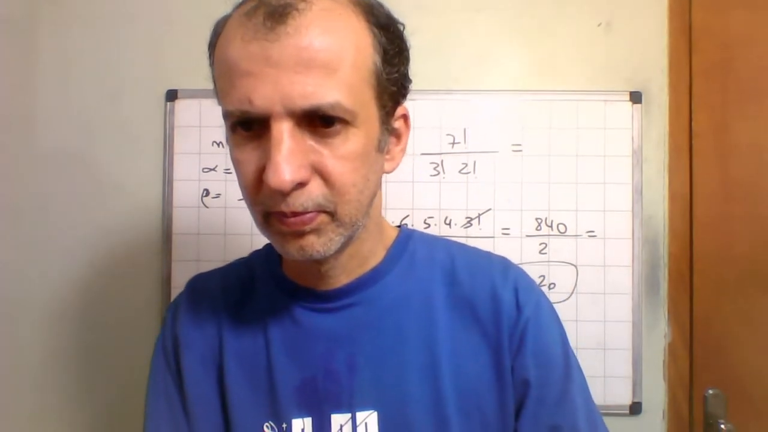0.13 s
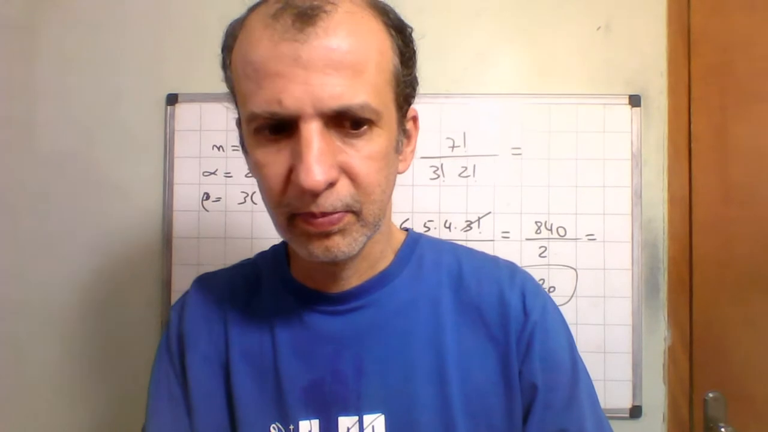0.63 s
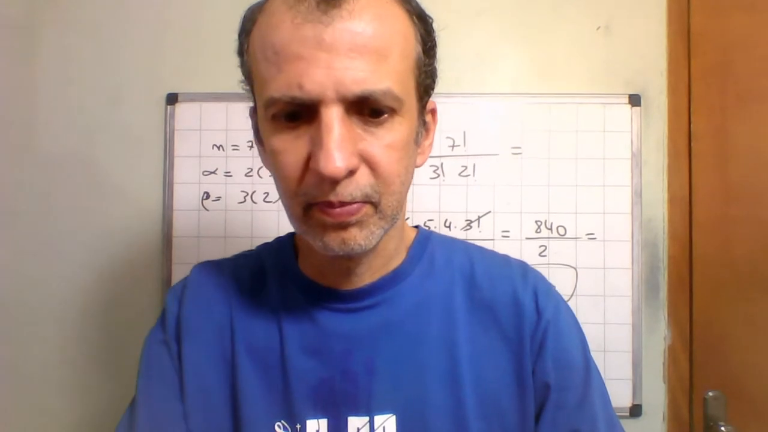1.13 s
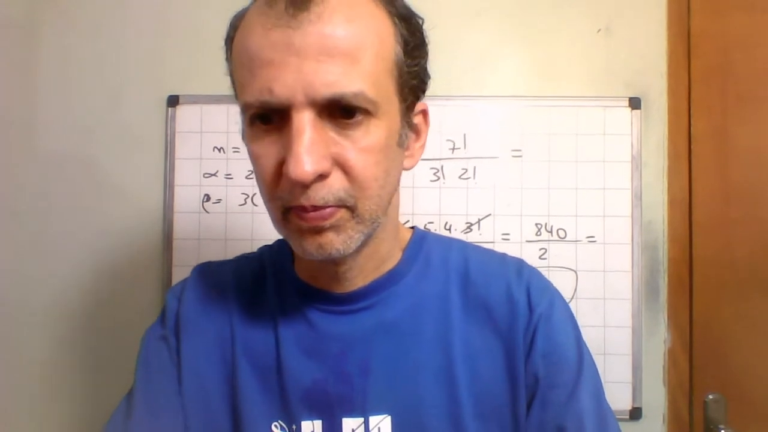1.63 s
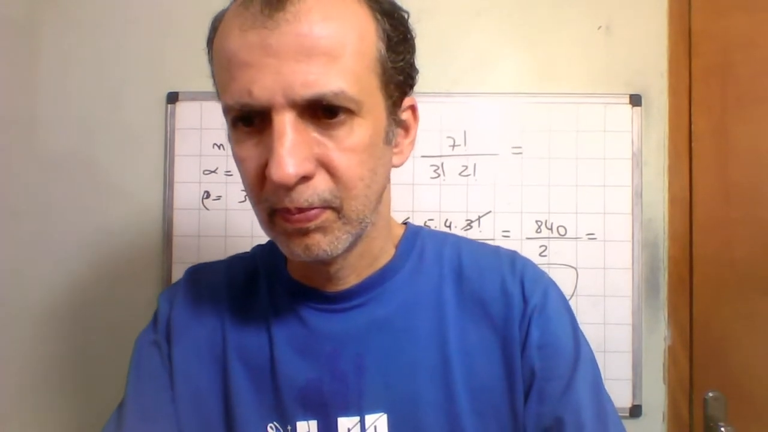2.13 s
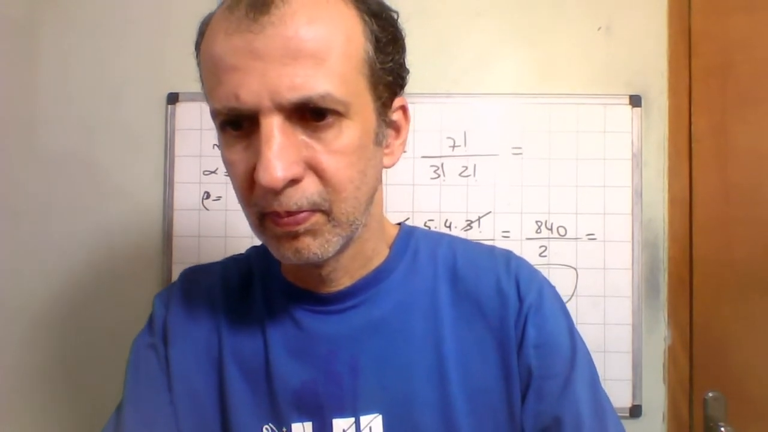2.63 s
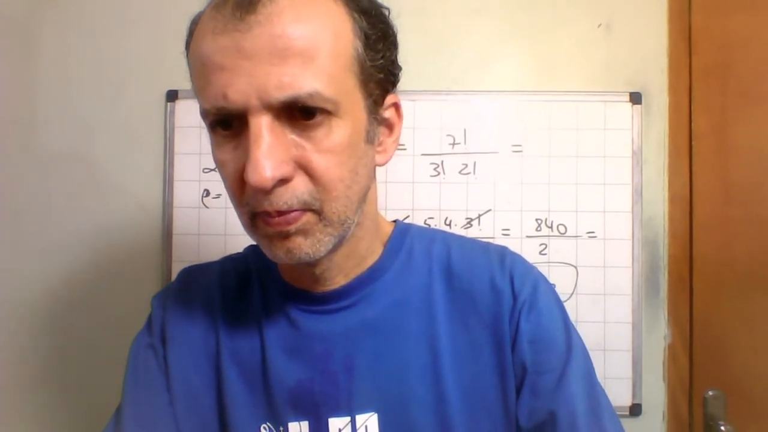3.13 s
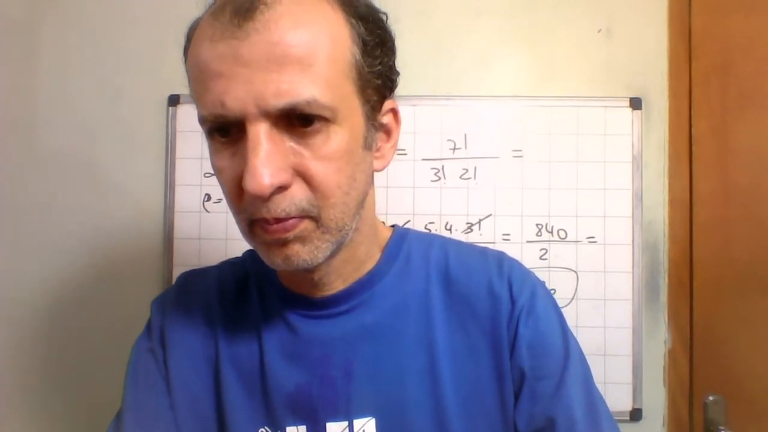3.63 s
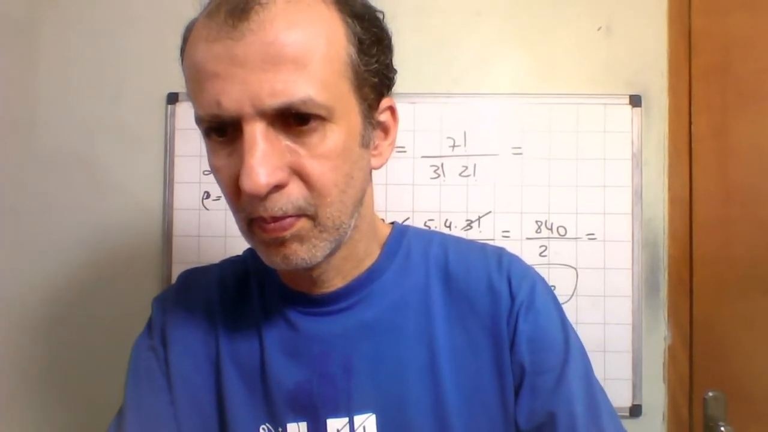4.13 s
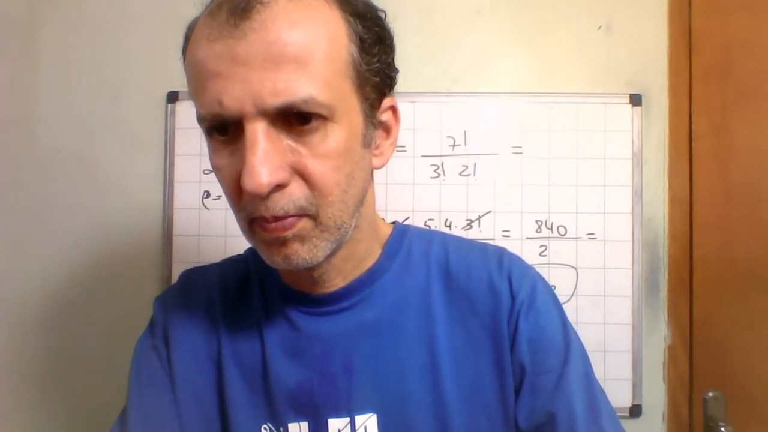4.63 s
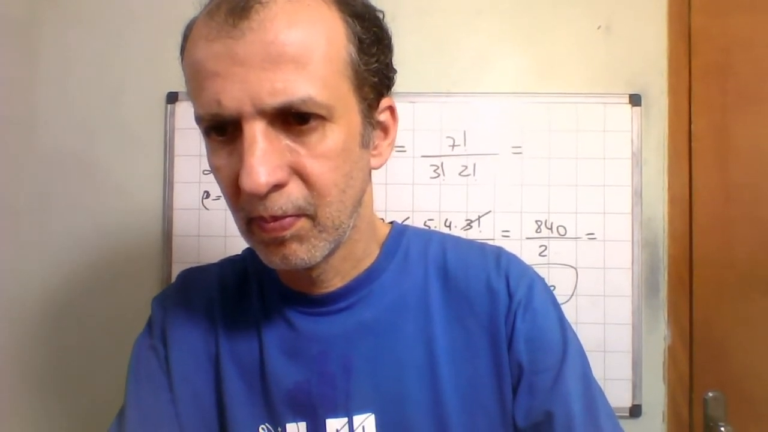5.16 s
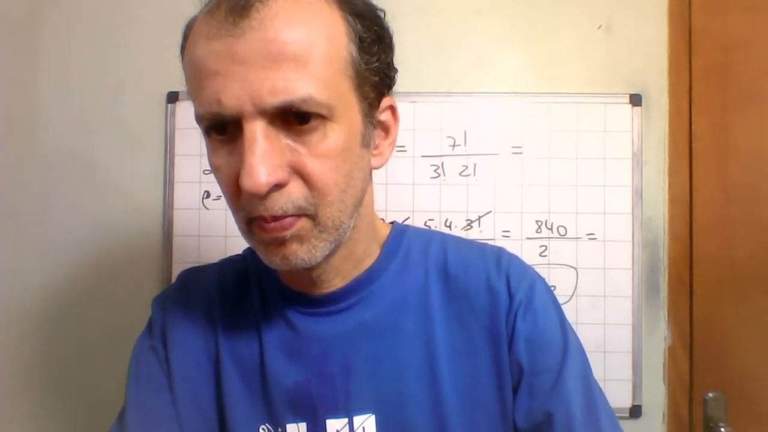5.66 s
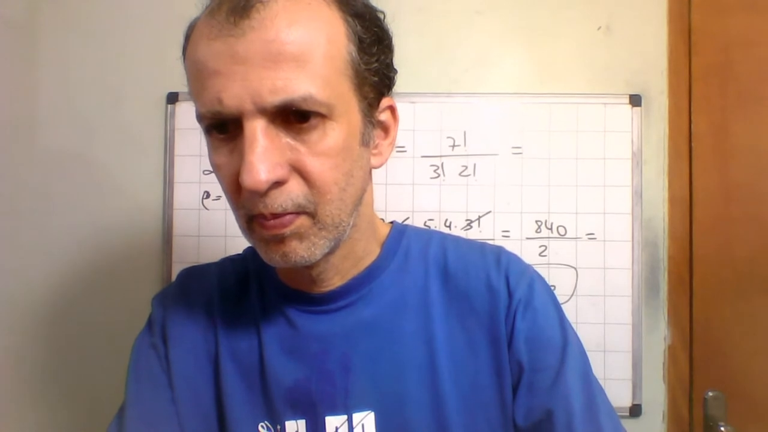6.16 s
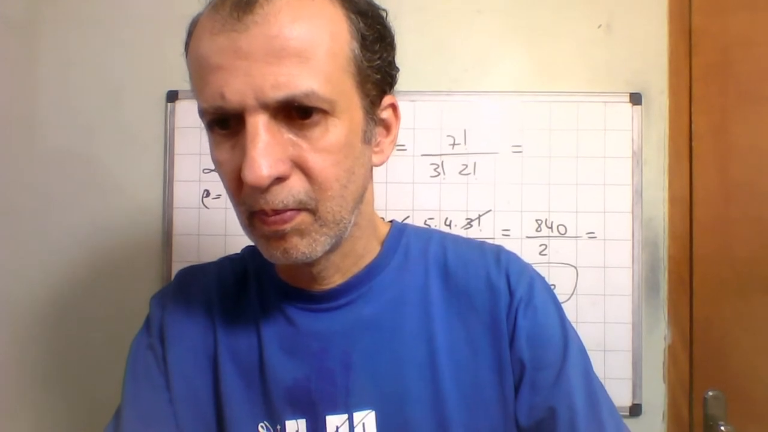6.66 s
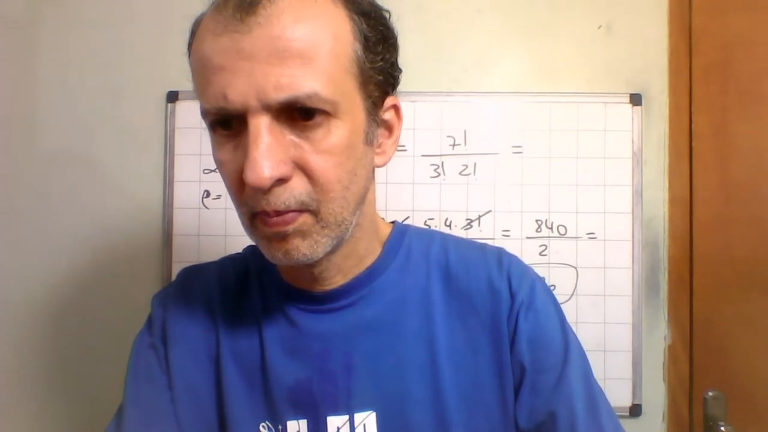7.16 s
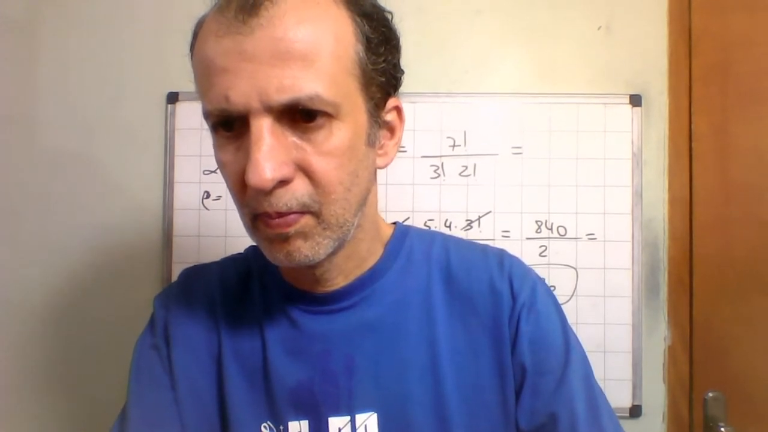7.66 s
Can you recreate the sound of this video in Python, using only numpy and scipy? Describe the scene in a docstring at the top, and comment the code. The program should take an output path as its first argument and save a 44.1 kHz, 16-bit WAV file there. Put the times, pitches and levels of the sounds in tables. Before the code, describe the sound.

A few sparse key taps, then busy laptop typing, clacky and thumpy up close, with a faint fan and short pauses.

```python
"""A quiet room, close to a laptop: its built-in microphone hears someone type on it for almost eight seconds.
A fan hisses from the start over two low motor tones; a few sparse keys come first, then busy typing.
Each contact ticks and clacks in the air as bursts of noise through resonances, then knocks the deck's modes;
low thumps swell through the case, their lowest modes last, and the room answers clicks and knocks with a blurred echo.
A noise gate turns everything down in the pauses, as before the last keys."""
import sys
import numpy as np
from scipy import signal
from scipy.fft import rfft, irfft, next_fast_len
from scipy.io import wavfile
from scipy.ndimage import uniform_filter1d, minimum_filter1d, map_coordinates

SR = 44100
rng = np.random.default_rng(int(sys.argv[2]) if len(sys.argv) > 2 else 0)


def field_ratio(decibels):
    """Amplitude ratio for a level in dB (20 dB per decade); scalars and array-likes work."""
    return 10 ** (np.asarray(decibels, dtype=float) / 20)


def materialize(psi):
    """Save the field psi as 16-bit PCM at rate SR to the path in sys.argv[1].

    A 1-D psi becomes a single channel; in a 2-D psi each row is a channel.
    """
    bounded = np.clip(np.atleast_2d(psi).T, -1, 1)
    quanta = np.round(bounded * 32767).astype(np.int16)
    wavfile.write(sys.argv[1], SR, quanta)


N = 343098  # samples


def along(points, hz):
    """Interpolates (f/Hz, value) points on a log frequency axis."""
    f, v = np.transpose(points)
    return np.interp(np.log(hz + 1), np.log(f + 1), v)


def coloured(x, spectrum):
    """Filters x by a response given as (f/Hz, level/dB) points."""
    size = next_fast_len(len(x) + 8192)
    gain = field_ratio(along(spectrum, np.fft.rfftfreq(size, 1 / SR)))
    return irfft(rfft(x, size) * gain, size)[:len(x)]


def noise(spectrum):
    """Coloured noise of rms 1."""
    x = coloured(rng.standard_normal(N), spectrum)
    return x / x.std()


def add(track, sound, s):
    """Lays a sound on a track from second s, trimmed to the track's ends."""
    start = round(s * SR)
    part = track[max(start, 0):][:len(sound) + min(start, 0)]
    part += sound[max(-start, 0):][:len(part)]


def ring(modes, spread_db, attack, size):
    """One blow on decaying modes, each at a new strength and phase; power 1 before attack (s) and decay."""
    hz, db, t60 = np.transpose(modes)[:, :, None]
    t = np.arange(size) / SR
    gain = field_ratio(db + spread_db * rng.standard_normal(hz.shape))
    waves = field_ratio(-60 * t / t60) * np.sin(2 * np.pi * (hz * t + rng.random(hz.shape)))
    onset = 1 - np.exp(-t / attack)
    return (gain * waves).sum(0) * onset / np.sqrt((gain ** 2).sum() / 2)


def resonate(x, peaks, order=1):
    """Passes x order times through causal resonances, scaled to keep the power of white noise."""
    size = next_fast_len(len(x) + 8192)
    f = np.fft.rfftfreq(size, 1 / SR)
    response = 0
    for k, (centre, width, db) in enumerate(peaks):
        peak = 1j * f * width / (centre * centre - f * f + 1j * f * width)
        response = response + (-1) ** k * field_ratio(db) * peak  # neighbours in opposite phase
    response = response ** order
    return irfft(rfft(x, size) * response, size)[:len(x)] / np.sqrt(np.mean(abs(response) ** 2))


CLUMP_S, CLUMP_DB = .002, 3  # the tiny collisions come in clumps: spacing, depth


def clatter(times, levels, lead, hold, t60, grit_db):
    """Each contact is a cluster of tiny collisions of set energy: they build up over lead s, hold, then thin out."""
    out = np.zeros(N)
    t = np.arange(-SR // 50, SR // 20) / SR
    shape = np.where(t < 0, field_ratio(60 * t / lead), field_ratio(-60 * np.maximum(t - hold, 0) / t60))
    steps = np.arange(len(times) * len(t))
    # grit: the size wanders between random values 20 samples apart
    grit = rng.standard_normal(len(steps) // 20 + 2)
    sizes = field_ratio(grit_db * map_coordinates(grit, [steps / 20], order=1))
    clump = rng.standard_normal(len(steps) // 20)
    clumps = field_ratio(CLUMP_DB * map_coordinates(clump, [steps / SR / CLUMP_S], order=1))
    collisions = sizes * clumps * rng.standard_normal(len(steps))
    bursts = shape * collisions.reshape(len(times), -1)
    for s, gain, burst in zip(times, levels, bursts):
        add(out, gain * burst * np.linalg.norm(shape) / np.linalg.norm(burst), s + t[0])
    return out


# colour of the fan's air noise: f/Hz, relative level/dB per Hz
FAN_AIR = [(45, -27.5), (80, -12.5), (140, -5.5), (290, -12), (420, -15), (800, -17.5), (1100, -26.5),
           (1500, -23.5), (1680, -23.5), (1850, -26.5), (2300, -35.5), (4600, -41), (5800, -32),
           (8650, -31.5), (11500, -38.5)]
# motor tones, ahead of the microphone: f/Hz, level/dB rms
MOTOR_TONES = [(64.6, -76), (91.5, -67)]


def fan():
    """Steady air noise whose level drifts a little, over two low motor tones."""
    t = np.arange(N) / SR
    drift = rng.standard_normal(N * 8 // SR + 4)  # eight points a second
    drift_db = .7 * map_coordinates(drift, [t * 8])
    hum = sum(field_ratio(db) * np.sqrt(2) * np.sin(2 * np.pi * (hz * t + rng.random())) for hz, db in MOTOR_TONES)
    return field_ratio(-61 + drift_db) * noise(FAN_AIR) + hum


# the room's decay: f/Hz, t60/s
ROOM_DECAY = [(300, 0.21), (1500, 0.26), (4000, 0.3), (10000, 0.33)]


def room(x):
    """Reflections blur into noise with the broad colour of the source; each frequency dies at its own speed."""
    hz, t, z = signal.stft(x, SR, nperseg=256)
    power = uniform_filter1d(abs(z) ** 2, size=7, axis=0)
    fade = field_ratio(-60 * t[:200] / along(ROOM_DECAY, hz)[:, None]) ** 2
    heard = signal.fftconvolve(power, fade / fade.sum(1)[:, None], axes=1)[:, :len(t)]
    blur = signal.stft(rng.standard_normal(N), SR, nperseg=256)[2]
    tail = signal.istft(np.sqrt(abs(heard)) * blur / blur.std(), SR, nperseg=256)[1]
    return np.pad(tail, (220, 0))[:N]  # the echo sets in 5 ms late


# blows felt through the case: peak t/s, level/dB ahead of the microphone, centre of the modes it stirs f/Hz
CASE_BLOWS = [(0.082, -54, 147), (0.142, -55.5, 85), (0.645, -49.5, 141), (0.692, -47.5, 150),
              (0.825, -48, 160), (0.956, -37.5, 181), (1.123, -27.5, 167), (1.319, -23, 168),
              (1.339, -26.5, 152.4), (1.441, -25.5, 155), (1.632, -24.5, 111), (1.771, -26, 123),
              (1.802, -26.5, 117.3), (1.955, -18.5, 188), (2.146, -24, 147), (2.243, -45.5, 151.6),
              (2.293, -25, 136.6), (2.33, -25, 163), (2.496, -23, 163), (2.62, -27, 158),
              (2.671, -22.5, 125), (2.775, -31.5, 121), (3.066, -21.5, 171), (3.201, -23, 203),
              (3.25, -25, 194), (3.273, -30.5, 126), (3.38, -27, 170), (3.588, -47.5, 185),
              (3.69, -20.5, 163), (3.851, -22.5, 140), (3.983, -22, 187), (4.057, -27.5, 200),
              (4.123, -29.5, 138), (4.205, -34, 224), (4.228, -33.5, 125), (4.268, -20.5, 165),
              (4.444, -26, 182), (4.471, -26, 136), (4.496, -24.0, 156), (4.65, -26.5, 150),
              (4.938, -22, 160), (5.073, -30.5, 154.4), (5.191, -29, 144), (5.327, -26, 174),
              (5.384, -46, 143), (5.535, -23, 164.3), (5.666, -29, 165), (5.736, -24.5, 205),
              (5.76, -26, 132), (5.84, -33, 202), (5.883, -28, 222), (5.924, -23.5, 161),
              (6.029, -23.5, 141.0), (6.062, -26.5, 157), (6.163, -24.5, 157), (6.193, -27, 170),
              (6.317, -28.5, 141), (6.408, -34.5, 132.0), (6.493, -27.5, 148), (6.564, -21, 161),
              (6.684, -38, 134), (6.746, -28.5, 168), (6.768, -28.5, 143), (6.865, -31.5, 140),
              (6.917, -30.5, 156), (7.442, -35, 137), (7.466, -33.5, 113), (7.573, -26.5, 148)]
# modes of the case: f/Hz, relative level/dB, t60/s
CASE_MODES = [(75.8, 1.5, 0.27), (106.3, 3, 0.19), (132, 4, 0.16), (152.7, 7, 0.12), (181.5, -5.5, 0.26),
              (214.2, 6.5, 0.093), (259, 1.5, 0.075)]


def thumps():
    """Bending waves swell slowly, the low ones arriving last; the modes nearest the blow's centre lead."""
    out = np.zeros(N)
    hz, db, t60 = np.transpose(CASE_MODES)[:, :, None]
    t, lead = np.arange(SR // 4) / SR, .03  # s; lead leaves room for the swell before the peak
    for s, level_db, centre_hz in CASE_BLOWS:
        off_centre_db = -13.2 * np.log2(hz / centre_hz) ** 2
        gain = field_ratio(db + off_centre_db + 3.8 * rng.standard_normal(hz.shape))
        phase = 2 * np.pi * rng.random() + 1.76 * rng.standard_normal(hz.shape)
        since = t - lead - 0.0054 * np.log2(centre_hz / hz)  # 5.4 ms later per octave down
        rise = 3.3 / hz  # 3.3 cycles
        swell = np.sin(np.pi / 2 * np.clip(1 + since / rise, 0, 1)) ** 2
        decay = field_ratio(-60 * np.maximum(since, 0) / t60)
        waves = gain * swell * decay * np.cos(2 * np.pi * hz * (t - lead) + phase)
        add(out, field_ratio(level_db) * waves.sum(0) / np.linalg.norm(gain), s - lead)
    return out


# key contacts: t/s, knock base level/dB, tick level/dB ahead of the microphone, tone of the clack f/Hz
KEY_CONTACTS = [(0.066, -53.5, -86, 2420), (0.608, -57, -52.5, 4210), (0.792, -50, -73, 1570),
                (0.9234, -52, -51, 1850), (0.9356, -53.5, -46.5, 1500), (0.987, -48.5, -60, 3400),
                (1.1009, -40, -50, 3400), (1.3062, -39.5, -49.5, 1500), (1.391, -46.5, -58, 3100),
                (1.405, -39, -50.5, 2870), (1.5686, -60, -48, 2580), (1.5824, -46.5, -49, 2490),
                (1.6077, -37, -49.5, 2190), (1.6576, -46.5, -56, 4650), (1.7323, -55, -53, 1500),
                (1.743, -40, -54, 1500), (1.7534, -45.5, -56, 1500), (1.779, -39.5, -71, 1840),
                (1.9301, -26.5, -30, 1600), (2.1182, -41.5, -44.5, 2060), (2.2739, -45.5, -80, 2100),
                (2.301, -53, -53.5, 3240), (2.3124, -45, -66, 1800), (2.466, -42, -52, 4760),
                (2.483, -40.5, -47.5, 1500), (2.499, -55, -57, 4700), (2.6028, -46, -57, 3220),
                (2.6436, -46, -48.5, 1500), (2.752, -47, -95, 2590), (3.051, -33.5, -47.5, 2430),
                (3.1885, -32.5, -51, 2090), (3.219, -44, -54, 1570), (3.231, -43, -48, 3320),
                (3.2404, -37.5, -42.5, 1600), (3.311, -54, -48.5, 1500), (3.3314, -54.5, -49, 1610),
                (3.3574, -45.5, -55, 2480), (3.3758, -45, -58, 1570), (3.5656, -50, -53, 2060),
                (3.672, -33, -35.5, 1750), (3.7979, -42, -60, 1860), (3.819, -38, -44, 1970),
                (3.8286, -41, -49, 2260), (3.85, -39.5, -50.5, 2680), (3.9099, -52, -45.5, 1540),
                (3.9287, -50, -63, 3070), (3.9524, -39, -60, 3380), (3.9719, -37.5, -42.5, 1660),
                (4.0396, -44.5, -61, 1830), (4.084, -51, -55.5, 3170), (4.1023, -45, -58, 1500),
                (4.122, -54, -66, 2480), (4.1929, -46.5, -56, 1670), (4.2397, -40, -41.5, 2960),
                (4.421, -44.5, -65, 1500), (4.4308, -30.5, -45.5, 2050), (4.4792, -33.5, -42, 4300),
                (4.632, -47, -61.5, 1530), (4.9176, -31.5, -46, 3400), (5.052, -45.5, -62, 1760),
                (5.075, -52, -63, 2040), (5.1496, -51.5, -50.5, 1500), (5.308, -43, -64, 1720),
                (5.4672, -49, -57.5, 4500), (5.5223, -36, -44, 1980), (5.5377, -41, -52, 1500),
                (5.647, -41, -66, 2120), (5.6969, -43, -49, 1530), (5.7058, -36, -46.5, 1500),
                (5.729, -32, -47.5, 2270), (5.8204, -49, -55.5, 1500), (5.859, -49, -53, 1760),
                (5.874, -39.5, -41.5, 1500), (5.9035, -33, -46.5, 4500), (5.967, -52.5, -62.5, 1580),
                (6.0056, -41, -46.5, 1500), (6.048, -43, -59, 1660), (6.113, -45, -53.5, 1500),
                (6.146, -33.5, -51.5, 1630), (6.2892, -41, -46, 2730), (6.297, -38, -46, 1500),
                (6.326, -58, -58, 4270), (6.379, -47.5, -64, 1500), (6.437, -53, -61, 2490),
                (6.4595, -37.5, -47.5, 1500), (6.5352, -39.5, -40, 4160), (6.545, -39, -54, 1560),
                (6.7022, -42.5, -51, 2580), (6.7205, -38, -56, 2400), (6.842, -49, -64, 2770),
                (6.996, -49, -45.5, 2900), (7.0095, -49.5, -50, 3300), (7.422, -56, -81.5, 1850),
                (7.555, -40.5, -69, 2510)]
RATTLE_SHARE, RATTLE_WAIT_S = 0.18, 0.079  # chance per contact; range of the random wait, after 10 ms
RATTLE_DB, RATTLE_SPREAD_DB = -57, 3  # mean and spread of both knock and tick


def contacts():
    """The listed contacts and the faint rattles that follow some of them."""
    s, _, _, tone_hz = np.transpose(KEY_CONTACTS)
    chance, wait = rng.random((len(s), 2)).T
    knock_db, tick_db = RATTLE_DB + RATTLE_SPREAD_DB * rng.standard_normal((len(s), 2)).T
    rattles = np.transpose([s + .01 + RATTLE_WAIT_S * wait, knock_db, tick_db, tone_hz])
    return np.vstack([KEY_CONTACTS, rattles[chance < RATTLE_SHARE]])


# modes of the deck, before the tilt for hard blows: f/Hz, relative level/dB, t60/s
DECK_MODES = [(313, 3, 0.056), (369.4, -8.5, 0.088), (449.7, 2, 0.044), (513.7, -6, 0.079),
              (603, -5.5, 0.034), (712, -7.5, 0.05), (770, -8.5, 0.038), (920, -4.5, 0.027),
              (1038, -11.5, 0.024), (1188, -12, 0.023), (1356, -8, 0.016)]


def knocks(hits):
    """The deck answers each contact a moment later, and a slower-rising ring follows a few ms behind; hard
    blows ring brighter."""
    out = np.zeros(N)
    for s, knock_db, _, _ in hits:
        tilt_db = 0.33 * (knock_db + 36.5)  # per octave above 440 Hz
        modes = [(hz, db + tilt_db * np.log2(hz / 440), t60) for hz, db, t60 in DECK_MODES]
        contact = ring(modes, spread_db=2, attack=0.00029, size=5000)
        delayed = ring(modes, spread_db=3.0, attack=0.0011, size=5000)
        add(out, field_ratio(knock_db + 2.5) * contact, s + .0012)
        add(out, field_ratio(knock_db + 7.0) * delayed, s + 0.004795)
    return out


# resonances of the key cap, each passed twice: f/Hz, width/Hz per pass, relative level/dB on the key's tone
CAP_PEAKS = [(1500, 560, 12), (2190, 1430, 8), (2730, 400, -8), (3400, 350, -3), (4670, 850, -6)]
# resonances of the key's hinge: f/Hz, width/Hz, relative level/dB
HINGE_PEAKS = [(7100, 900, -7), (7490, 670, -1), (8470, 1770, 4), (8900, 1600, 4), (11530, 1800, -6)]
# the clack grows with knock and tick: dB per dB of each; its level for a -40 dB knock and a -50 dB tick
CLACK_PER_KNOCK, CLACK_PER_TICK, CLACK_DB = 0.72, 0.46, -49.5
OFF_TONE_DB, TONE_FALL_DB = -6.5, 32  # floor for caps off the key's tone; fall per octave squared
CLACK_LAG_S = .0006  # the clack starts after the tick
CLACK_LEAD_S, CLACK_HOLD_S, CLACK_T60_S = 0.013, .002, 0.037
TICK_LEAD_S, TICK_HOLD_S, TICK_T60_S = .006, 0.0014, .011


def clicks(hits):
    """Collisions shake the key cap (clack), most in resonances near the key's tone, and its hinge (tick)."""
    s, knock_db, tick_db, tone_hz = hits.T
    clack_db = CLACK_DB + CLACK_PER_KNOCK * (knock_db + 40) + CLACK_PER_TICK * (tick_db + 50)
    share = field_ratio([np.maximum(db - TONE_FALL_DB * np.log2(hz / tone_hz) ** 2, OFF_TONE_DB)
                 for hz, _, db in CAP_PEAKS])
    share /= np.linalg.norm(share, axis=0)
    clack = np.zeros(N)
    for part, peak in zip(share, CAP_PEAKS):
        cap_hits = clatter(s + CLACK_LAG_S, field_ratio(clack_db) * part,
                           CLACK_LEAD_S, CLACK_HOLD_S, CLACK_T60_S, grit_db=4.5)
        clack += resonate(cap_hits, [peak], order=2)
    hinge_hits = clatter(s, field_ratio(tick_db), TICK_LEAD_S, TICK_HOLD_S, TICK_T60_S, grit_db=10)
    return clack + resonate(hinge_hits, HINGE_PEAKS)


def scene():
    """Keys in air and case, their echo and the fan."""
    hits = contacts()
    click, knock = clicks(hits), knocks(hits)
    echo = room(field_ratio(-8.5) * click + field_ratio(-13.5) * knock)
    return (click + knock + thumps() + echo + fan())[None]


# response of the built-in microphone: f/Hz, level/dB
MIC_RESPONSE = [(30, -41.5), (50, 2.5), (65, 1), (100, 2), (10900, 3), (11600, -12.5), (12500, -46.5),
                (14000, -64)]


def microphone(x):
    """The built-in microphone colours what reaches it and cuts the extremes of the spectrum."""
    return coloured(x, MIC_RESPONSE)


STILL_OPEN_DB = 13.5  # least opening at the start, left from earlier typing


def gate(x, open_db=-42, depth_db=20, hold=.11, sink=0.059):
    """Gain follows the level: it opens at once, holds (s), then sinks to -depth_db with time constant sink (s)."""
    level = 10 * np.log10(abs(uniform_filter1d(x ** 2, size=441)) + 1e-12)
    wait = int(hold * SR)
    # highest level within the hold time
    held = -minimum_filter1d(-np.pad(level, (wait, 0), "edge"), wait + 1, origin=-(wait // 2))[:N]
    opening_db = np.clip(depth_db + 1.5 * (held - open_db), 1e-3, depth_db)
    opening_db[0] = max(opening_db[0], STILL_OPEN_DB)
    # a running maximum on a rising ramp lets the opening in dB die exponentially
    ramp = np.arange(N) / SR / sink
    opening_db = np.exp(np.maximum.accumulate(np.log(opening_db) + ramp) - ramp)
    return x * field_ratio(uniform_filter1d(opening_db, size=200) - depth_db)


def top_cut(x):
    """Nothing passes above the cut-off."""
    return signal.sosfilt(signal.butter(12, 12550, fs=SR, output="sos"), x)


def record(dry):
    """The laptop's own microphone hears the scene, and a noise gate quiets the pauses."""
    heard = microphone(dry[0])
    mix = gate(heard)[None]
    return top_cut(mix)


dry = scene()
out = record(dry)
materialize(out)
```